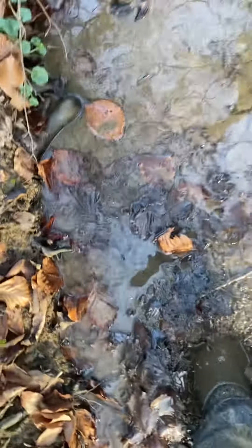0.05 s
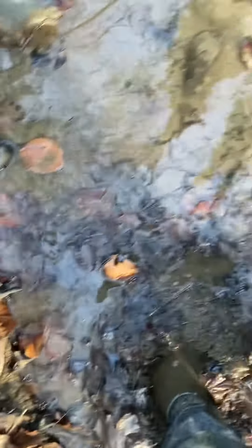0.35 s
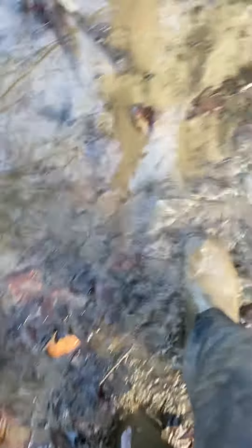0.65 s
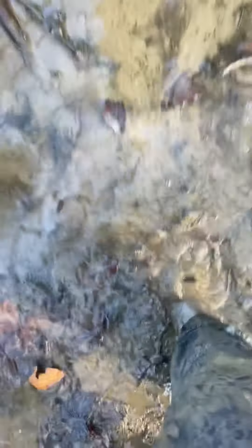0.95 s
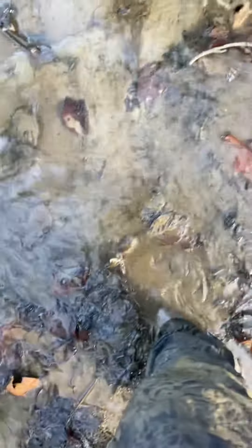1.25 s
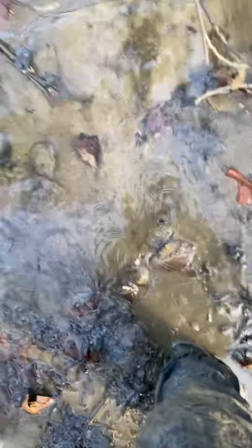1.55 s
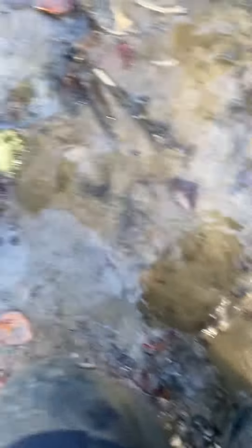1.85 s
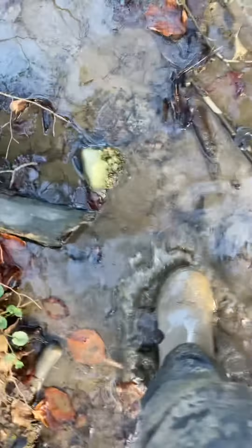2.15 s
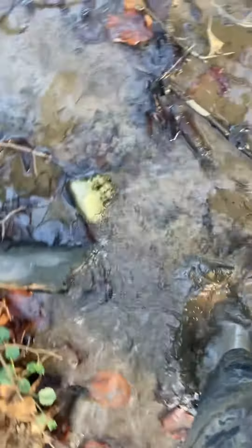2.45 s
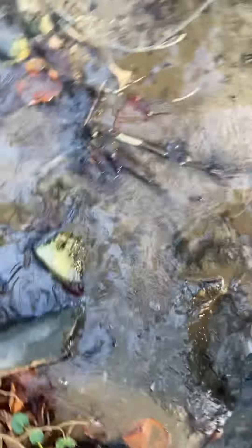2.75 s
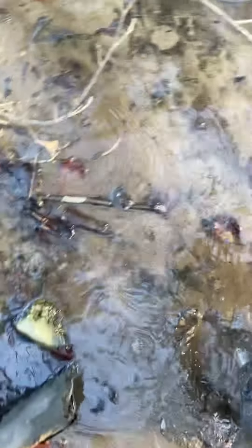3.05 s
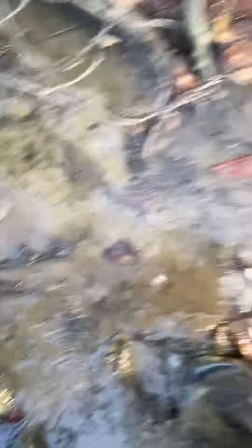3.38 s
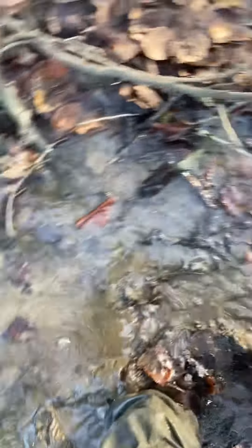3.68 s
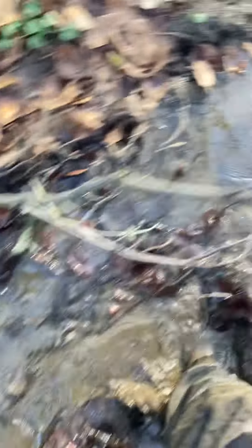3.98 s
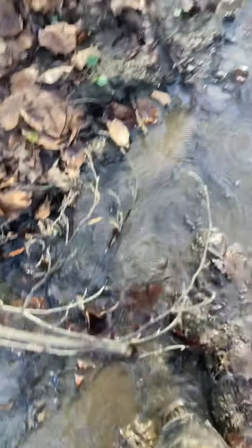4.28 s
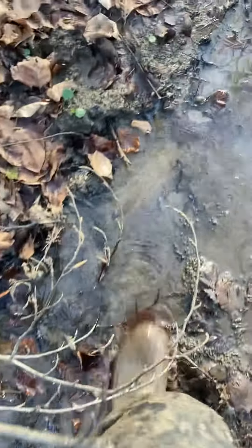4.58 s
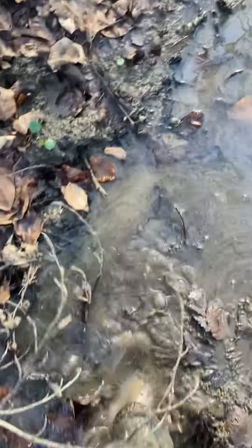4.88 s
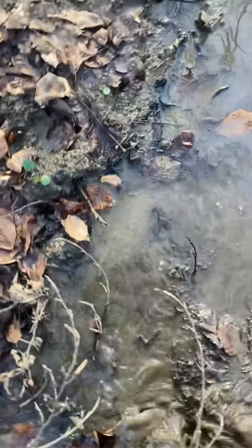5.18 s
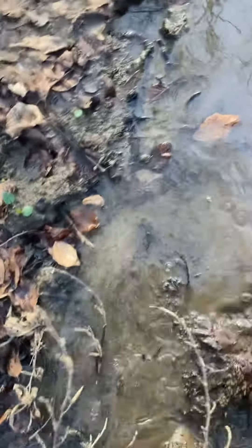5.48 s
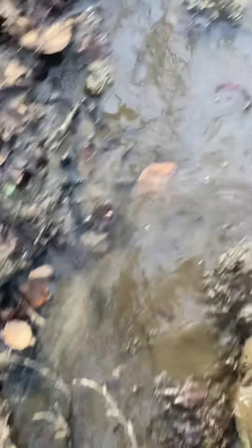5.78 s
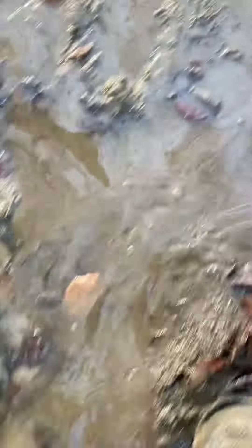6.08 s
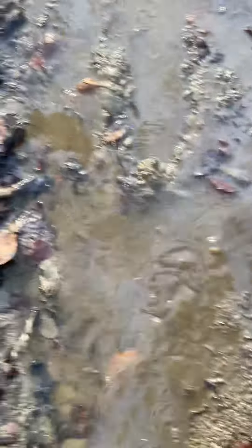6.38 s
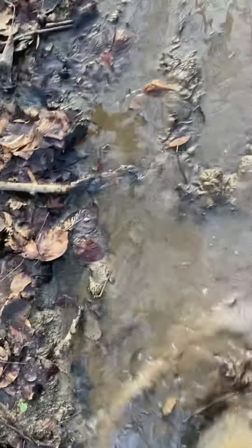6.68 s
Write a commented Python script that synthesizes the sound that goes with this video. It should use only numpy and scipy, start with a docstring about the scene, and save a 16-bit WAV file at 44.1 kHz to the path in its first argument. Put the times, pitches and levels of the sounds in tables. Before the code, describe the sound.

Wet, squelching footsteps keep an irregular pace as rubber boots push into watery woodland mud and pull free. The mud pops and spits, stirred water gurgles and fizzes, and leaves and twigs tick. The steps grow busier in the second half, where a distant bird gives four thin falling chirps, and later two more. A faint low rumble of air runs underneath, with soft bumps of wind twice on the close, hand-held microphone.

```python
"""Rubber boots wade through wet mud and shallow water in a wood, heard from about a metre above.
From the first stride, air pockets pop as resonant cavities, tearing films spit, leaves and twigs tick,
bubbles glide in pitch and stirred water sloshes and fizzes, over a low rumble of moving air.
Just past three seconds, soft buffets reach the hand-held microphone; then a small bird calls faintly.
The strides go on, the buffets return at six seconds, and two more bird notes sound near the end."""
import sys
import numpy as np
from scipy import signal
from scipy.fft import rfft, irfft, next_fast_len
from scipy.io import wavfile
from scipy.ndimage import uniform_filter1d

SR = 44100
rng = np.random.default_rng(int(sys.argv[2]) if len(sys.argv) > 2 else 0)


def wrap_up_sound(samples):
    """Save the sound to the file named by the first command line argument, as 16-bit audio."""
    columns = np.atleast_2d(samples).T
    # keep every value between -1 and 1, then stretch to whole-number steps
    tamed = np.clip(columns, -1, 1)
    steps = np.round(tamed * 32767).astype(np.int16)
    wavfile.write(sys.argv[1], SR, steps)


N = 296793
TIME = np.arange(N) / SR
SIZE = next_fast_len(N + 8192)
FREQS = np.maximum(np.arange(SIZE // 2 + 1) * SR / SIZE, 1)

# spectrum of spitting films and falling drops: (frequency [Hz], level [dB])
SPRAY_SPECTRUM = [(500, -12), (2000, -7), (4000, -2), (6000, 8), (7400, 4.5), (9500, 1.5), (12000, -3.5),
                  (16000, -17)]


def pops(slosh, ring_cycles=5.1, rise=0.015, ring_db=14, squelch_db=-6, attack_s=0.00065, lead_s=0.005):
    """Cavity resonance: mud tears, and the opened air pocket rings and squelches in the same band."""
    # large air pockets: (time [s], level [dB], resonance [Hz], decay time [s])
    pockets = [(0.0645, -31.5, 780, 0.013), (0.1165, -33.5, 620, 0.025), (0.3056, -46, 1930, 0.011),
               (0.4025, -31, 1870, 0.02), (0.4128, -26, 2280, 0.0079), (0.4228, -32.5, 510, 0.029),
               (0.4525, -32, 1700, .012), (0.5219, -32.5, 1620, 0.022), (0.567, -37, 1800, .01),
               (0.588, -37, 1700, 0.0092), (0.619, -36, 1700, .012), (0.6275, -41, 604, 0.011),
               (0.6901, -39.5, 730, 0.037), (0.6954, -44.5, 192, 0.059), (0.8644, -41.5, 1830, 0.016),
               (1.0305, -52.5, 595, .01), (1.2555, -48.5, 920, .01), (1.4567, -37.5, 740, .025),
               (1.468, -34, 593, .025), (1.4843, -21.5, 900, .012), (1.4878, -24, 600, .008),
               (1.4925, -32, 720, .022), (1.5045, -37, 740, .035), (1.606, -37, 650, .016),
               (1.8315, -35, 650, 0.092), (1.988, -29.5, 1690, 0.011), (1.9975, -31, 2280, 0.016),
               (2.006, -40, 1700, 0.011), (2.015, -34.5, 1620, 0.01), (2.028, -32, 2500, .009),
               (2.0151, -33, 676, 0.008), (2.0512, -37, 1420, 0.012), (2.1027, -35, 1500, 0.0069),
               (2.3355, -39.5, 1460, 0.0077), (2.569, -44, 614, .02), (2.5863, -45, 447, 0.096),
               (3.046, -43, 570, 0.032), (3.0754, -24, 690, 0.021), (3.079, -32.5, 1760, 0.029),
               (3.0842, -34, 930, 0.037), (3.088, -42.5, 256, 0.063), (3.1857, -39, 513, 0.21),
               (3.2935, -26.5, 1960, 0.0063), (3.299, -27, 850, .008), (3.3105, -29, 1700, .012),
               (3.318, -26, 1340, .018), (3.329, -30.5, 1480, 0.0069), (3.3895, -35, 950, .01),
               (3.3935, -35, 1870, .012), (3.4055, -36, 1600, .01), (3.5543, -38, 795, 0.013),
               (3.8552, -32, 930, 0.0063), (4.1828, -23, 850, .005), (4.196, -22, 920, .005),
               (4.3355, -36, 1140, .009), (4.3855, -29, 1140, 0.0078), (4.5248, -39.5, 366, 0.017),
               (4.534, -36.5, 327, 0.016), (4.572, -26, 1750, .016), (4.583, -21.5, 1150, 0.012),
               (4.5838, -36, 376, 0.026), (4.587, -28, 1500, .01), (4.593, -30, 1060, .013),
               (4.6005, -28, 2110, .012), (4.679, -25, 824, 0.008), (5.2853, -30.5, 1980, 0.039),
               (5.3736, -38, 296, 0.16), (5.3841, -31, 1150, 0.1), (5.3949, -25, 1740, .011),
               (5.4076, -23.5, 2000, 0.0081), (5.6335, -34.5, 1180, 0.011), (5.785, -39.5, 500, 0.038),
               (5.8, -42, 268, 0.034), (6.3515, -45, 327, 0.013), (6.381, -34, 950, .01),
               (6.479, -33, 810, 0.019), (6.4885, -27.5, 1740, 0.017), (6.489, -34.5, 590, .012),
               (6.5491, -29.5, 2250, 0.016), (6.6722, -37, 855, 0.012)]
    out, t = np.zeros(N), TIME[:SR // 10]
    band_edges = 2 ** (1.325 * np.array([-.5, .5]))  # 1.325 octaves wide
    for s, db, hz, decay_s in pockets + small_pops(slosh):
        ring = np.sin(2 * np.pi * hz * t * (1 + rise * t / decay_s))
        ring *= fade(t, min(ring_cycles / hz, 2 * decay_s)) * (1 - np.exp(-t / attack_s)) ** 2
        add(out, s, from_db(db + ring_db) * ring)
        cavity = signal.butter(3, hz * band_edges, "band", fs=SR, output="sos")
        tear = signal.sosfilt(cavity, rng.standard_normal(2 * len(t)))
        tear = level_out(tear, span_s=0.0038)[-len(t):]
        swell = np.minimum(t / lead_s, 1) ** 2 * fade(np.maximum(t - lead_s, 0), 1.8 * decay_s)
        add(out, s + attack_s - lead_s, from_db(db + squelch_db) * tear * swell)
    return out


def small_pops(slosh, above_db=8.5, range_db=9.5, low_hz=456, high_hz=1700, cycles=30, count=38):
    """Resonator scaling: of the lesser pockets in worked mud, those that ring lower ring longer."""
    chance, strength, size, life = rng.random((count, 4)).T
    s, db = moments(slosh, chance)
    hz = low_hz * (high_hz / low_hz) ** size
    return list(zip(s, db + above_db - range_db * strength, hz, cycles * (.5 + life) / hz))


def spits(spray, level_db=0.5, snap_db=13.5, crack_db=-1.5, ragged_db=4, lead_s=0.0016):
    """Film rupture: a film stretches with a crackle, snaps, and leaves a ragged tail of droplets."""
    # strong spits of spray and tearing mud films: (time [s], level [dB], decay time [s])
    films = [(0.4076, -24.5, 0.033), (0.4235, -29.5, 0.025), (0.5765, -36, 0.0076), (0.611, -33.5, 0.011),
             (1.761, -33, 0.0083), (1.9885, -33, 0.015), (1.997, -25.5, 0.022), (2.015, -29.5, 0.037),
             (2.1097, -34.5, 0.007), (2.1727, -35, 0.0082), (3.079, -34, 0.013), (3.168, -41, .012),
             (3.2833, -35.5, 0.034), (3.3006, -36.5, 0.036), (3.8533, -35.5, 0.0087),
             (3.9965, -33.5, 0.0055), (4.1239, -33, 0.014), (4.1617, -37, 0.011), (4.3447, -30, 0.054),
             (4.5025, -23.5, 0.0067), (4.519, -19.5, 0.0065), (4.5715, -27.5, 0.043),
             (4.7045, -30.5, 0.011), (4.862, -48, .02), (4.8675, -23.5, 0.003), (4.8876, -34.5, 0.052),
             (4.995, -35, 0.1), (5.1905, -27.5, 0.0057), (5.2872, -21, 0.0041), (5.3664, -28.5, 0.037),
             (5.3755, -35, 0.041), (5.3858, -20, 0.015), (6.3933, -36.5, 0.029), (6.552, -30.5, 0.02)]
    power, snaps, t = np.zeros(N), np.zeros(N), TIME[:SR // 10]
    swell, after = np.minimum(t / lead_s, 1) ** 4, np.maximum(t - lead_s, 0)
    for s, db, decay_s in films + small_spits(spray):
        ragged = np.interp(t, np.arange(100) / 1000, rng.standard_normal(100))
        tail = fade(after, 2.6 * decay_s) * from_db(ragged_db * np.minimum(ragged, 1))
        shape = swell * (tail + from_db(crack_db) * fade(after, t60=0.0026))
        add(power, s + 0.00024 - lead_s, (from_db(db + level_db) * shape / shape.max()) ** 2)
        add(snaps, s + .0006, from_db([db + snap_db]))
    hiss = level_out(colour(rng.standard_normal(N), SPRAY_SPECTRUM), span_s=0.00042)
    return np.sqrt(power) * hiss + colour(snaps, SPRAY_SPECTRUM)


def small_spits(spray, level_db=-41, follows=0.18, range_db=10, decay_s=0.012, count=30):
    """Film rupture on a small scale: more frequent and a little louder where the spray is thick."""
    chance, strength, life = rng.random((count, 3)).T
    s, db = moments(spray, chance)
    levels = level_db + follows * (db - db.mean()) - range_db * strength
    return list(zip(s, levels, decay_s * (.5 + life)))


def bubble(hz, length, octaves, fall_db, jitter=0.045):
    """Damped oscillation: a bubble's ring dies away as its pitch glides ever faster, roughened by mud."""
    t = TIME[:int(length * SR)]
    age = t / length
    unsteady = np.interp(t * 500, np.arange(64), rng.standard_normal(64))
    pitch = hz * 2 ** (octaves * (age + age ** 2) / 2) * (1 + jitter * unsteady)
    envelope = from_db(fall_db * age) * signal.windows.tukey(len(age), .35)
    return envelope * np.sin(2 * np.pi * np.cumsum(pitch) / SR)


def large_bubbles(level_db=-2, wobble_db=2.5):
    """Bubble resonance: brief rings plop, long ones glide far, and mud roughens their level."""
    # bubbles and closing cavities: (time [s], level [dB], start pitch [Hz], end pitch [Hz], length [s])
    glides = [(0.073, -27, 785, 850, .009), (0.301, -39, 1860, 2600, .02), (0.454, -36, 1760, 2300, .014),
              (0.594, -35, 2030, 2750, .016), (0.872, -49, 560, 1050, .035), (1.732, -38.5, 297, 345, .013),
              (1.779, -34.5, 1230, 1400, .012), (1.851, -36.5, 617, 890, .02),
              (2.05, -38, 1280, 1700, .013), (2.058, -39, 1730, 2100, .011), (2.13, -39, 705, 800, .012),
              (2.145, -39.5, 2250, 2500, .011), (2.156, -40.5, 993, 1700, .028),
              (2.689, -51, 926, 2200, .04), (3.083, -34, 400, 190, .012), (3.287, -30, 780, 850, .008),
              (3.301, -20, 1050, 1200, .006), (3.329, -24, 1750, 2400, .009), (3.33, -29, 1060, 1260, .022),
              (3.353, -39, 837, 1800, .033), (3.466, -37, 1170, 1330, .012), (3.522, -35, 858, 1900, .033),
              (3.606, -39.5, 854, 1650, .03), (4.199, -28, 1150, 1000, .012), (4.223, -36, 750, 800, .015),
              (4.255, -39, 1600, 2600, .017), (4.649, -39, 1450, 1050, .007), (4.666, -31, 1150, 620, .008),
              (4.68, -34, 520, 190, .011), (4.826, -35, 360, 520, .016), (5.512, -33, 1003, 1340, .018),
              (5.631, -34, 1205, 1400, .01), (6.095, -38, 1230, 1900, .029), (6.1, -32.5, 680, 750, .01),
              (6.126, -34, 718, 930, .017), (6.347, -36, 965, 1100, .012), (6.612, -39, 1050, 1900, .018),
              (6.663, -37, 1750, 2100, .009), (0.932, -38.5, 620, 1650, .033),
              (1.721, -33, 1950, 1700, .012), (4.785, -36.5, 620, 1650, .035),
              (4.931, -32.5, 690, 1450, .035), (5.027, -32.5, 540, 1600, .044),
              (5.101, -34, 724, 1150, .024), (6.641, -27.5, 1000, 1400, .011)]
    out = np.zeros(N)
    for s, db, start_hz, end_hz, length in glides:
        ring = bubble(start_hz, length, np.log2(end_hz / start_hz), fall_db=-11)
        add(out, s, from_db(db + level_db) * ring)
    return out * from_db(wobble_db * drift(180))


def small_bubbles(low_hz=520, high_hz=1740, cycles=14.7, range_db=8, octaves=0.48, count=130):
    """Bubble resonance at random times: each lesser bubble has its own life and upward glide."""
    out = np.zeros(N)
    for when, size, strength, life, glide in rng.random((count, 5)):
        hz = low_hz * (high_hz / low_hz) ** size
        blip = bubble(hz, cycles * (.5 + life) / hz, octaves * glide, fall_db=-19)
        add(out, when * N / SR, from_db(-range_db * strength) * blip)
    return out


def stirring(push_s=0.076, entry_db=2, entry_t60=0.75):
    """Incoherent addition: strides swell, settle and sum in power, giving the four water layers' gains."""
    # a boot pushes in or pulls out:
    # (time [s], length [s], slosh [dB], gurgle [dB], splatter [dB], fizz [dB])
    strides = [(0.02, .22, -49, -59, -56, -50), (0.395, .21, -53.5, -67, -52.5, -50.5),
               (1.359, 0.12, -64, -67, -66.5, -61), (1.467, .14, -51, -52.5, -56, -53),
               (1.722, .13, -51.5, -58.5, -58, -54.5), (1.982, .16, -54.5, -85, -54.5, -55.5),
               (2.334, .40, -61.5, -60, -70.5, -65), (3.041, .13, -54, -55.5, -60.5, -59.5),
               (3.295, .13, -46.5, -66, -56, -52), (3.527, .05, -55, -60.5, -57.5, -55.5),
               (3.858, .25, -58.5, -63, -59.5, -57.5), (4.173, .26, -49.5, -55.5, -52, -50.5),
               (4.516, .20, -49.5, -52, -53.5, -49.5), (4.845, 0.046, -53.5, -59, -60, -54),
               (4.943, .08, -51, -59, -57, -43.5), (5.098, .05, -54, -57, -51.5, -55.5),
               (5.21, .46, -49, -64.5, -56.5, -47.5), (5.737, .26, -49.5, -56, -58, -54),
               (6.086, .13, -46.5, -54.5, -54.5, -51), (6.332, .14, -47, -57.5, -54, -52.5),
               (6.608, .1, -53.5, -67.5, -62, -55.5)]
    # one value a layer, in the same order
    trickle_db, settle_t60 = (-65.5, -68, -73, -65), (0.71, 0.92, 0.46, 1.0)
    lull_share = np.array([1, 0.99, 0.21, 0.3])
    power = from_db(trickle_db)[:, None] ** 2 * np.ones(N)
    t = TIME[:2 * SR] - push_s
    push = np.minimum(1 + t / push_s, 1) ** 2 * from_db(entry_db * fade(np.maximum(t, 0), entry_t60))
    for s, length, *levels in strides:
        for layer, db, t60 in zip(power, levels, settle_t60):
            gain = from_db(db) * push * fade(np.maximum(t - length, 0), t60)
            add(layer, s - push_s, gain[t >= -s] ** 2)
    return np.sqrt(power) * lulls() ** lull_share[:, None]


def lulls():
    """Loss of excitation: the gain sinks briefly while neither boot stirs the water."""
    # pauses between steps: (centre time [s], length [s], depth [dB])
    pauses = [(1.08, .45, -7), (1.938, .1, -8), (2.265, .1, -3), (4.765, .09, -4), (5.16, .08, -5),
              (5.6, .09, -3), (3.745, .22, -11)]
    db = np.zeros(N)
    for s, length, depth_db in pauses:
        add(db, s - length / 2, depth_db * np.hanning(int(length * SR)))
    return from_db(db)


def cavity_cloud(spectrum, low_hz, high_hz, per_s, spread_db, cycles, rise, wash_db):
    """Superposition: many tiny cavities ring for a few cycles each, rising in pitch, over a smooth wash."""
    when, size, strength, life = rng.random((int(per_s * N / SR), 4)).T[:, :, None]
    hz = low_hz * (high_hz / low_hz) ** size
    turns = hz * TIME[:int(min(cycles / low_hz, .05) * SR)]
    age = turns / (cycles * (.5 + life))
    gain = from_db(spread_db * np.minimum(-np.log(1 - strength), 4))
    envelope = fade(age, 1.0) * (1 - np.exp(-2 * turns))
    grains = gain * envelope * np.sin(2 * np.pi * turns * (1 + rise * age))
    places = (when * N).astype(int) + np.arange(turns.shape[1])
    rings = np.bincount(places.ravel(), grains.ravel(), N)[:N]
    wash = rms_one(colour(rng.standard_normal(N), spectrum))
    return level_out(rms_one(colour(rings, spectrum)) + from_db(wash_db) * wash, span_s=0.081)


def stirred_water(slosh, gurgle, splatter):
    """Resonance falls with size: middling cavities slosh, large ones gurgle, the smallest splatter."""
    # spectra of the three cavity clouds: (frequency [Hz], level [dB])
    slosh_spectrum = [(280, -8), (480, -3), (750, 6), (1150, 3.5), (1600, -7.5), (2600, -51)]
    gurgle_spectrum = [(80, -4.5), (150, -7), (230, -1.5), (420, 1.5), (520, 6), (750, -19.5)]
    splatter_spectrum = [(800, -11), (1400, -7), (1900, -3), (2600, -2), (3600, 0), (4600, 5.5),
                         (6500, -16)]
    middling = cavity_cloud(slosh_spectrum, low_hz=415, high_hz=1810, per_s=280,
                            spread_db=3.4, cycles=11, rise=0.095, wash_db=-4.5)
    large = cavity_cloud(gurgle_spectrum, low_hz=126.6, high_hz=564, per_s=190,
                         spread_db=3.5, cycles=4.9, rise=0.079, wash_db=-13)
    small = cavity_cloud(splatter_spectrum, low_hz=1110, high_hz=5210, per_s=520,
                         spread_db=3.8, cycles=10, rise=0.24, wash_db=-6)
    return slosh * from_db(-2.5) * middling + gurgle * from_db(0.5) * large + splatter * from_db(4) * small


def fizz(hiss_db=5.5, flutter_db=2.5):
    """Shot noise: droplets and bursting films, each a tick of noise, merge into a bright crackle."""
    # spectrum of the crackle: (frequency [Hz], level [dB])
    fizz_spectrum = [(2000, -1.5), (3800, -5), (5000, -19), (6300, 4.5), (7400, -0.5), (9500, 1.5),
                     (12000, -2), (14000, -8.5), (16000, -12.5)]
    power = decaying_power(clicks(per_s=340, spread_db=3.2), t60=0.0025)
    envelope = np.sqrt(power / power.mean() + from_db(hiss_db) ** 2) * from_db(flutter_db * drift(70))
    return level_out(colour(envelope * rng.standard_normal(N), fizz_spectrum), span_s=0.46)


def ticks(level_db=6.5, width_hz=5000, tail_db=-19, tail_t60=0.009):
    """Impulse response: each snap excites a broad resonance of its own and leaves a faint gritty tail."""
    # snaps of mud skin, leaves and twigs: (time [s], level [dB], centre frequency [Hz])
    snaps = [(0.351, -28, 8200), (0.523, -34.5, 7500), (0.5763, -23.5, 12300), (0.5888, -28, 9400),
             (0.6443, -28.5, 9700), (0.724, -41, 11200), (0.838, -42, 6500), (0.8475, -43, 10000),
             (0.85, -45, 4600), (0.8975, -46, 7800), (0.925, -39, 10500), (0.9405, -49, 9000),
             (0.9523, -45, 11000), (0.9795, -47, 8500), (1.0283, -39, 12000), (1.073, -43, 9100),
             (1.154, -41, 8850), (1.3079, -45, 7500), (1.7391, -32, 7350), (1.884, -35.5, 8500),
             (2.257, -40.5, 7500), (2.3353, -40, 9400), (2.3527, -37, 9500), (2.3856, -42, 14000),
             (2.4214, -40, 12000), (2.494, -43, 12000), (2.514, -39, 11500), (2.9612, -39, 8500),
             (3.1093, -50, 8200), (3.1419, -45, 13500), (3.2486, -37, 7600), (3.4646, -31, 9700),
             (3.563, -34, 8500), (3.668, -34.5, 7500), (3.775, -39.5, 9000), (3.997, -32, 10500),
             (4.3938, -23, 9100), (4.563, -23, 9000), (4.6218, -40, 9000), (4.6945, -27, 9000),
             (4.825, -30, 8100), (4.92, -31, 11000), (5.1033, -42, 8500), (5.8625, -34, 10000),
             (5.9155, -33.5, 7400), (5.9915, -33, 13600), (6.2073, -32, 11200), (6.452, -34, 9500)]
    out, t = np.zeros(N), TIME[:SR // 30]
    radius = np.exp(-np.pi * width_hz / SR)
    for s, db, hz in snaps:
        click = (t == 0) + from_db(tail_db) * fade(t, tail_t60) * rng.standard_normal(len(t))
        resonator = [1, -2 * radius * np.cos(2 * np.pi * hz / SR), radius ** 2]
        snap = signal.lfilter([1, 0, -1], resonator, click)
        add(out, s, from_db(db + level_db) * snap / np.abs(snap).max())
    return out


def droplets(tail_db=-44):
    """Impact noise: lone drops and pinhead bubbles tick on the wet surface."""
    drops = clicks(per_s=22, spread_db=1.5)
    tails = np.sqrt(decaying_power(drops, t60=0.0053)) * rng.standard_normal(N)
    return colour(drops + from_db(tail_db) * tails, SPRAY_SPECTRUM)


def bird(level_db=-0.5, warble_hz=80, waver_db=2, echo_db=-9, echo_t60=0.14):
    """Frequency modulation: thin falling notes warble far off, with faint echoes among the trees."""
    # notes: (time [s], length [s], start pitch [Hz], end pitch [Hz], level [dB])
    notes = [(3.815, .042, 7800, 6100, -49), (3.944, .052, 7550, 5900, -51), (4.085, .042, 5950, 4550, -43),
             (4.203, .046, 5850, 4450, -43), (6.46, .058, 7150, 6820, -58), (6.678, .052, 7330, 7200, -51)]
    out, t = np.zeros(N), TIME[:SR // 4]
    for s, length, start_hz, end_hz, db in notes:
        pitch = start_hz + (end_hz - start_hz) * np.linspace(0, 1, int(length * SR)) ** 1.25
        pitch += warble_hz * drift(470)[:len(pitch)]
        note = signal.windows.tukey(len(pitch), .5) * np.sin(2 * np.pi * np.cumsum(pitch) / SR)
        add(out, s, from_db(db + level_db) * note)
    paths = rng.standard_normal(len(t)) * fade(t, echo_t60)
    echoes = signal.fftconvolve(out, paths / np.linalg.norm(paths))[:N]
    return (out + from_db(echo_db) * echoes) * from_db(waver_db * drift(120))


def buffets():
    """Pressure fluctuation: a few slow swings of air, in antiphase at the microphone's two ports."""
    # puffs of air: (centre time [s], length [s], frequency [Hz], level [dB])
    puffs = [(3.323, 0.036, 69.5, -38), (3.618, 0.026, 111, -30), (3.653, 0.061, 74.5, -26),
             (6.007, 0.035, 75, -36), (6.029, 0.063, 82, -26)]
    out = np.zeros(N)
    for s, length, hz, db in puffs:
        t = TIME[:int(length * SR)] - length / 2
        add(out, s - length / 2, from_db(db) * np.hanning(len(t)) * np.sin(2 * np.pi * hz * t))
    return out * np.array([[1], [-.35]])


def air_rumble():
    """Flow noise: air rumbles on the swinging microphone, partly coherent between the ports."""
    # swells of the rumble: (time [s], level [dB])
    swells = [(0, -58.5), (1.3, -60), (1.55, -53), (1.95, -61), (2.22, -72), (2.36, -56), (2.92, -61.5),
              (3.15, -55), (3.6, -52), (3.78, -52.5), (4.05, -55.5), (4.2, -58), (5.65, -60), (5.88, -53),
              (6.25, -52.5), (6.45, -64), (6.73, -55)]
    # its spectrum: (frequency [Hz], level [dB])
    rumble_spectrum = [(20, -57), (40, -4), (72, 4), (110, -4), (180, -15.5), (400, -38.5)]
    flow = np.array([[0.58, 0.28], [0.0089, 0.58]]) @ rng.standard_normal((2, N))
    return from_db(np.interp(TIME, *np.transpose(swells))) * rms_one(colour(flow, rumble_spectrum))


def quiet_wood():
    """Ambient noise: a steady hush, uncorrelated between the ports."""
    # spectrum of the hush: (frequency [Hz], level [dB])
    hush_spectrum = [(25, -39), (70, -6), (200, -9), (800, -8.5), (1600, -17), (3000, -12.5), (8000, -35.5),
                     (12000, -59), (16000, -48)]
    return rms_one(colour(rng.standard_normal((2, N)), hush_spectrum))


def scatter(x, ground_t60=0.04, trees_t60=0.076, trees_db=-11, count=90):
    """Multipath reflection: echoes from ground, legs and trunks change pattern as the walker moves on."""
    out, t, hop = np.zeros((2, N)), TIME[:SR // 10], N // count + 1
    decay = (fade(t, ground_t60) + from_db(trees_db) * fade(t, trees_t60)) * (1 - np.exp(-t / 0.00035))
    for k in range(count + 1):
        at = np.arange(max(k - 1, 0) * hop, min((k + 1) * hop, N))
        piece = x[at] * np.cos(np.pi / 2 * (at / hop - k))
        for side in out:
            paths = rng.standard_normal(len(t)) * decay
            add(side, at[0] / SR, signal.fftconvolve(piece, paths / np.linalg.norm(paths)))
    return out


def at_ports(x, scattered):
    """Phase and level differences: direct sound reaches the ports out of step, mixed with scattered sound."""
    # phase between the ports: (frequency [Hz], lead of the left [rad])
    left_lead = [(100, 0), (300, -.45), (600, -1.15), (900, -1.25), (1400, .3), (2100, 1.0), (3000, 2.4),
                 (5400, 3.2), (6500, 3.9), (7800, 6.0), (9300, 6.55), (11100, 9.2), (12500, 9.6),
                 (13800, 12.4), (16000, 12.6)]
    # balance, mostly to the right: (frequency [Hz], left minus right [dB])
    balance = [(150, 1), (380, 0.5), (700, -4.5), (1200, -8.5), (2400, -1), (3500, -5.5), (5500, 1),
               (16000, -1)]
    # scattered part of the sound: (frequency [Hz], share of power [0-1])
    scattered_share = [(200, .06), (600, .12), (1200, .2), (2000, .3), (3000, .45), (5000, .06),
                       (8000, .03), (16000, .03)]
    share, sides = by_hz(scattered_share), np.array([[.5], [-.5]])
    direct = np.exp(1j * sides * by_hz(left_lead)) * rfft(x, SIZE)
    gains = from_db(sides * by_hz(balance))
    gains /= np.sqrt(np.mean(gains ** 2, axis=0))
    mixed = np.sqrt(1 - share) * direct + np.sqrt(share) * rfft(scattered, SIZE)
    return irfft(gains * mixed, SIZE)[:, :N]


def moments(gain, chance):
    """Random times, closer where the gain is high, with the level in dB at each."""
    due = (np.arange(len(chance)) + chance) / len(chance)
    at = np.minimum(np.searchsorted(np.cumsum(gain) / gain.sum(), due), N - 1)
    return TIME[at], 20 * np.log10(gain[at])


def clicks(per_s, spread_db):
    """Poisson process: random impulses, most small and a few large."""
    sizes = from_db(spread_db * np.minimum(rng.exponential(1, N), 4))
    return (rng.random(N) < per_s / SR) * sizes * rng.choice([-1, 1], N)


def decaying_power(impulses, t60):
    """Leaky integration: each impulse's energy dies away exponentially."""
    return signal.lfilter([1], [1, -fade(1 / SR, t60) ** 2], impulses ** 2 + 1e-18)


def level_out(x, span_s):
    """Division by the running rms evens out a texture and keeps its grain."""
    power = np.maximum(uniform_filter1d(x ** 2, int(span_s * SR)), 0)
    return x / np.sqrt(power + 1e-3 * np.mean(x ** 2))


def colour(x, spectrum):
    """Spectral shaping under which white noise keeps its power."""
    return irfft(rfft(x, SIZE) * rms_one(from_db(by_hz(spectrum))), SIZE)[..., :N]


def by_hz(points):
    """Interpolation of a table on a log frequency axis."""
    hz, value = np.transpose(points)
    return np.interp(np.log(FREQS), np.log(hz), value)


def drift(rate):
    """Smooth random modulation with rms 1."""
    knots = rng.standard_normal(4096)
    return rms_one(np.interp(TIME * rate, np.arange(len(knots)), knots))


def fade(t, t60):
    """Exponential decay, 60 dB down at t60."""
    return np.exp(-np.log(1000) * t / t60)


def from_db(db):
    """Decibels to gain."""
    return 10 ** (np.asarray(db) / 20)


def rms_one(x):
    """Scale to rms 1."""
    return x / np.sqrt(np.mean(x ** 2) + 1e-20)


def add(out, s, sound):
    """Superpose a short sound at time s."""
    i = int(np.clip(round(s * SR), 0, N - 1))
    out[i:i + len(sound)] += sound[:N - i]


def scene():
    """Superposition: mud, water and bird reach the ports, over moving air and the quiet of the wood."""
    slosh, gurgle, splatter, spray = stirring()
    sources = pops(slosh) + spits(spray) + large_bubbles()
    sources += slosh * from_db(-1.5) * small_bubbles()
    sources += stirred_water(slosh, gurgle, splatter) + spray * fizz() + ticks()
    # drops keep falling between the steps, so they follow the spray only loosely
    sources += np.sqrt(spray) * from_db(-8.5) * droplets()
    sources += bird()
    air = buffets() + from_db(-1.5) * air_rumble() + from_db(-65.5) * quiet_wood()
    return at_ports(sources, scatter(sources)) + air


def record(dry, cutoff_hz=15800):
    """Band limiting: an elliptic low-pass cuts the top steeply."""
    return signal.sosfilt(signal.ellip(10, .1, 70, cutoff_hz, fs=SR, output="sos"), dry)


dry = scene()
out = record(dry)
wrap_up_sound(out)
```